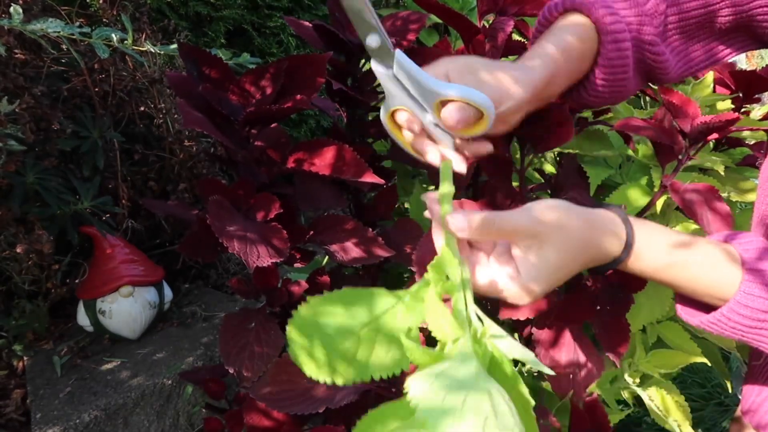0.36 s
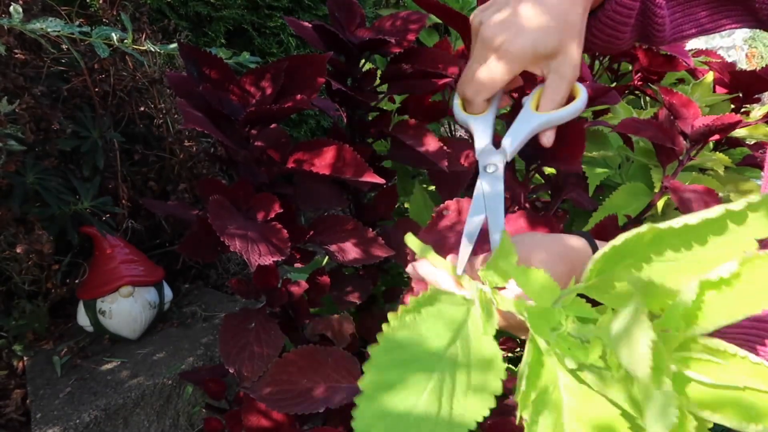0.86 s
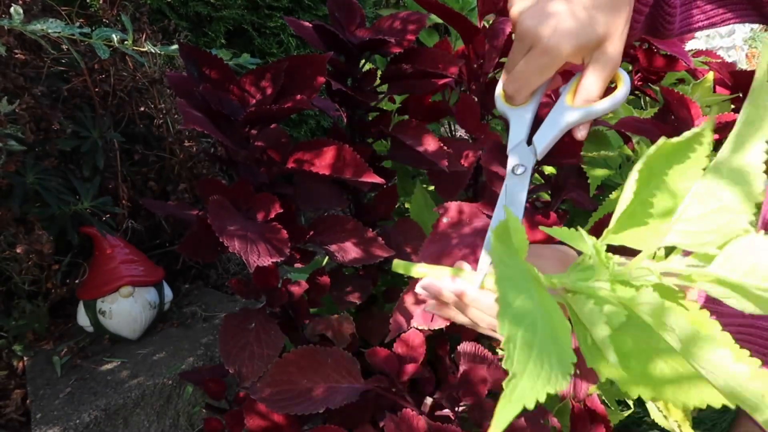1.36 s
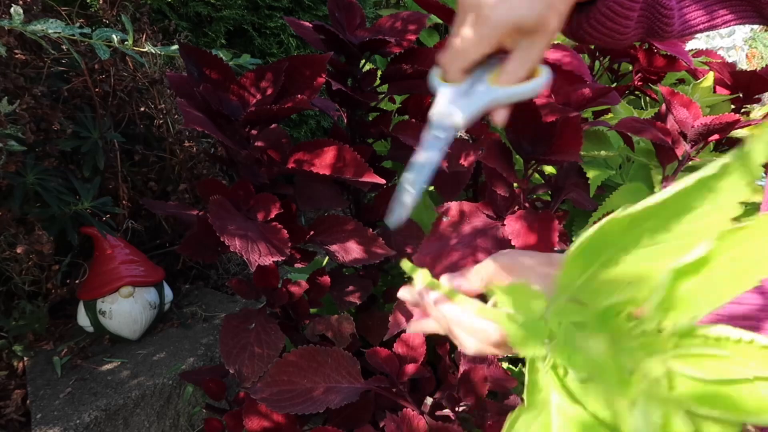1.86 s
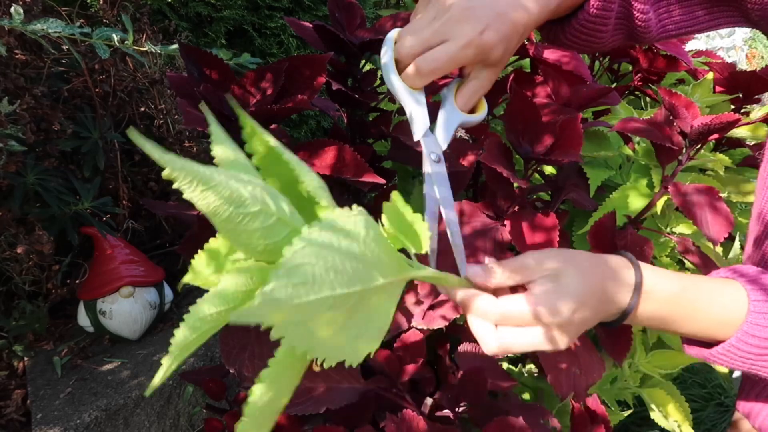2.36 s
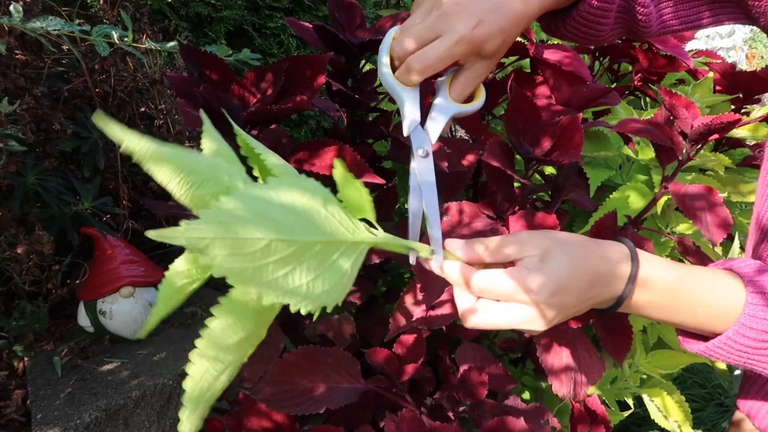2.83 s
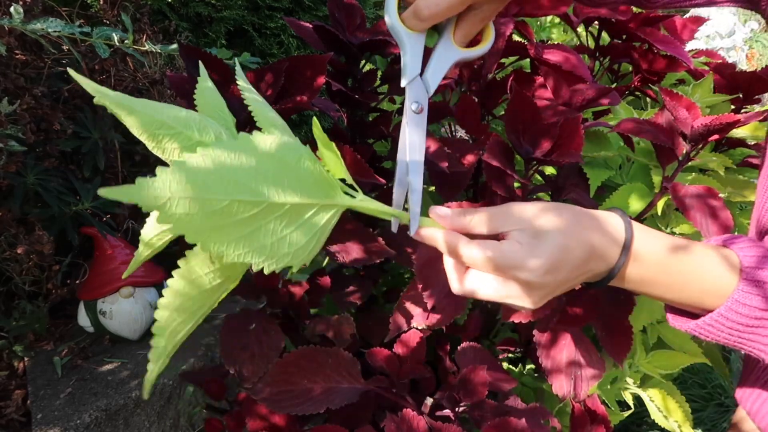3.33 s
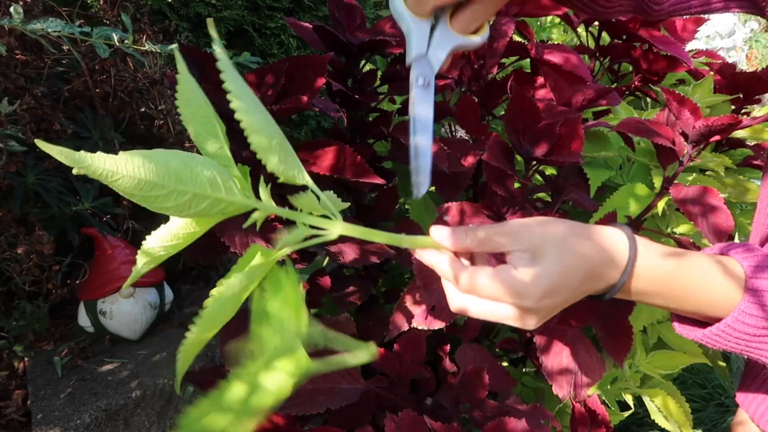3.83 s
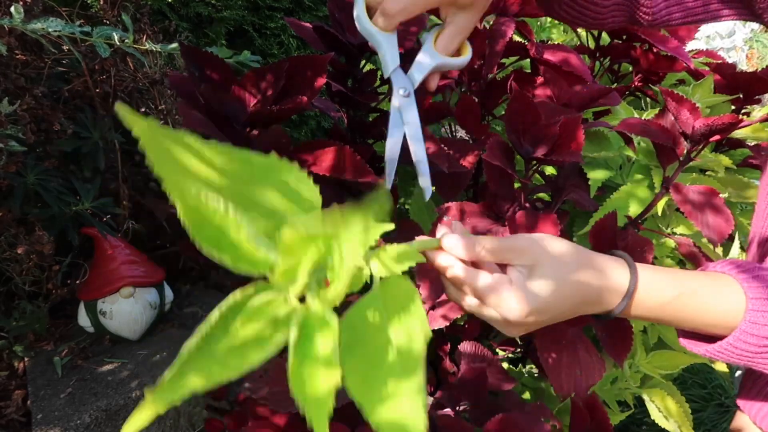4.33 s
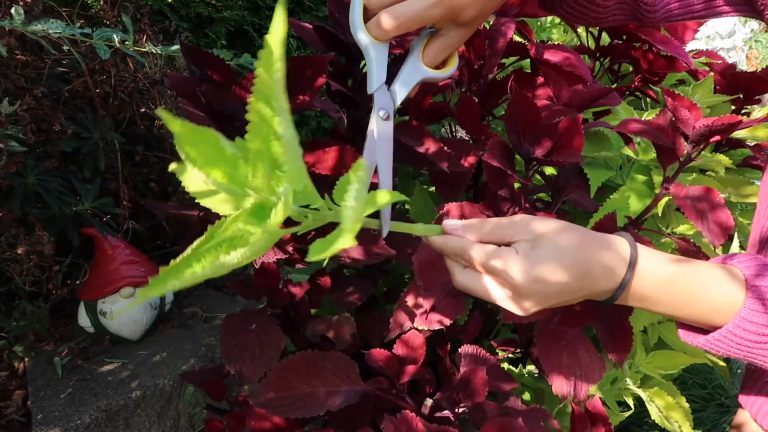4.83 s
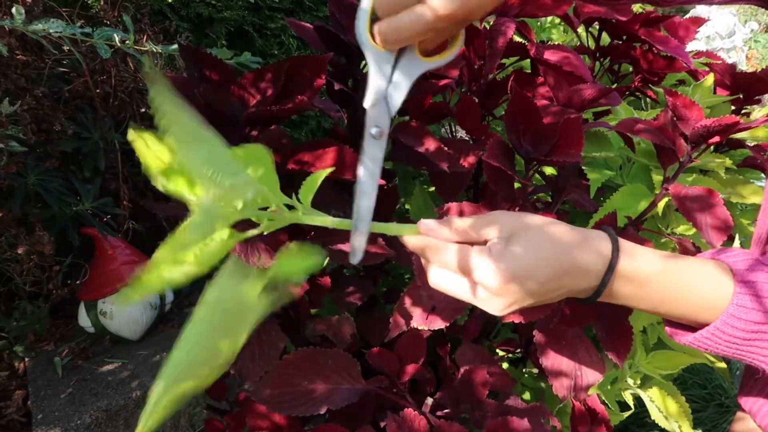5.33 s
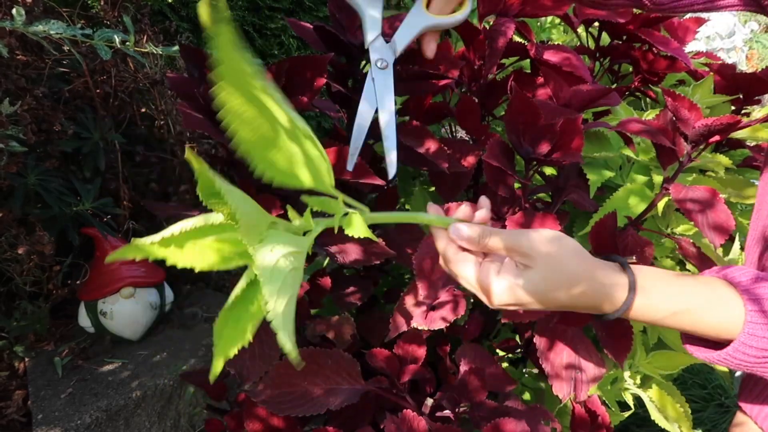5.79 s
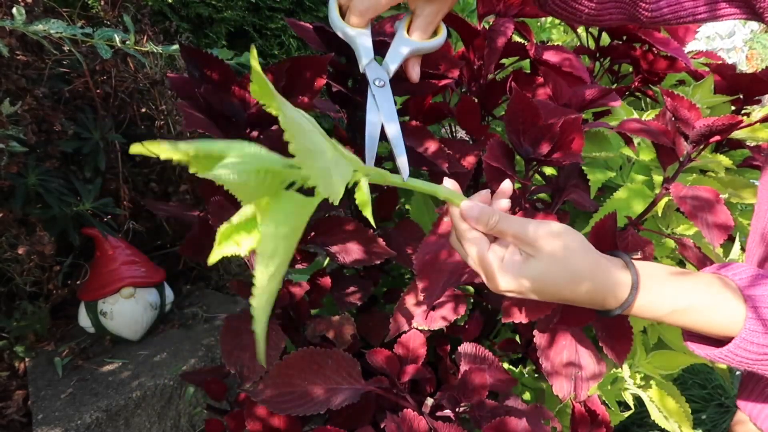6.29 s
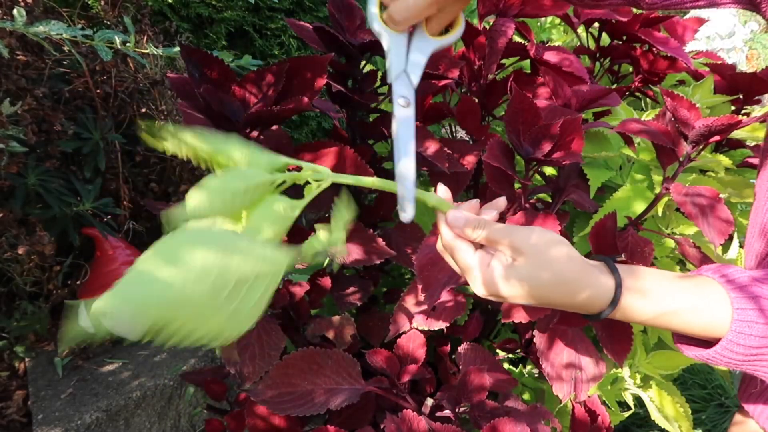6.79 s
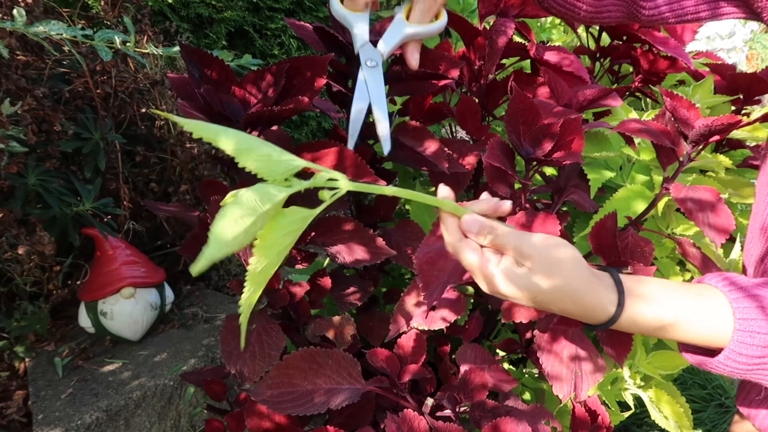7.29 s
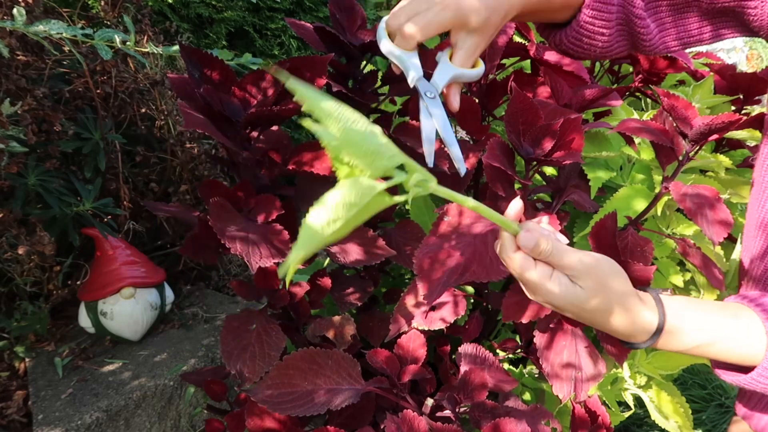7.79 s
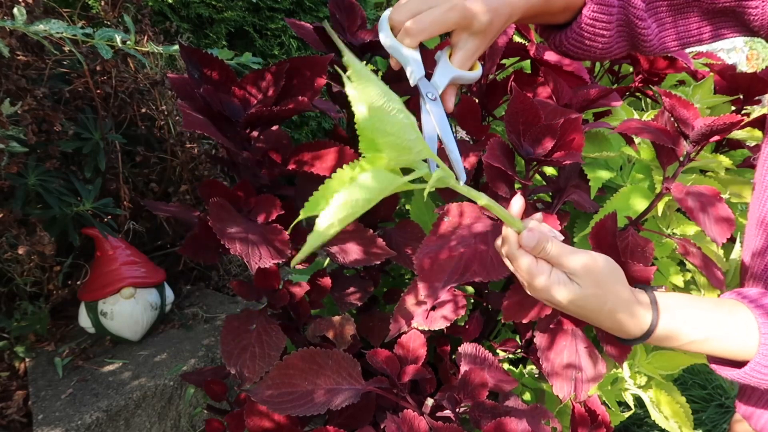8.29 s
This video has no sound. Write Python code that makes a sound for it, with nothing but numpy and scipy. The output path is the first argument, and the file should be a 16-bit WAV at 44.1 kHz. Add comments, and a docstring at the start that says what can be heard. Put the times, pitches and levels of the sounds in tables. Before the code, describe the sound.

Four crisp, close scissor snips crunch through soft plant stems, with leaves rustling between cuts over a faint low traffic rumble outdoors.

```python
"""Scissors in the garden

Steel scissors snip soft plant stems close to a phone. Crunches are lumpy noise through a resonance;
the blades clack shut as short rings with a crack and a thud, and the ground and foliage answer.
Leaves brush and drop between cuts as softer noise bursts, with a few low knocks as dying sine waves.
Far traffic is drifting, shaped noise, and a faint steady line at 13 kHz is a wavering sine wave.
"""
import sys
import numpy as np
from scipy import signal
from scipy.fft import rfft, irfft, next_fast_len
from scipy.io import wavfile
from scipy.ndimage import uniform_filter1d, map_coordinates

SR = 44100
rng = np.random.default_rng(int(sys.argv[2]) if len(sys.argv) > 2 else 0)


def boost(x):
    """Linear amplitude factor 10**(x/20) for a level x in decibels (scalar or array-like)."""
    u = np.asarray(x, float) / 20
    return 10 ** u


def file_out(sig):
    """Save sig as 16-bit WAV at sys.argv[1]."""
    # one column per channel
    cols = np.atleast_2d(sig).T
    # limit, then scale
    lim = np.clip(cols, -1, 1)
    pcm = np.round(lim * 32767).astype(np.int16)
    wavfile.write(sys.argv[1], SR, pcm)


N = 381465  # length in samples


def unit(x):
    """Scales a sound to an average strength (rms) of 1."""
    return x / np.sqrt(np.mean(x ** 2) + 1e-20)


def along(points, hz):
    """Reads a curve of (pitch_hz, value) points, with straight lines on a log pitch axis."""
    f, v = np.transpose(points)
    return np.interp(np.log(hz + 1), np.log(f + 1), v)


def wobble(rate):
    """A smooth random curve with `rate` random points a second."""
    knots = rng.standard_normal(int(N * rate / SR) + 4)
    return map_coordinates(knots, [np.arange(N) * rate / SR])


def filtered(x, response):
    """Changes the strength and phase of each frequency by response(hz)."""
    size = next_fast_len(x.shape[-1] + 2048)
    spectrum = rfft(x, size) * response(np.fft.rfftfreq(size, 1 / SR))
    return irfft(spectrum, size)[..., :x.shape[-1]]


def add(track, s, sound):
    """Mixes a sound into a track from time s in seconds."""
    part = track[round(s * SR):][:len(sound)]
    part += sound[:len(part)]


def rush(spectrum):
    """Stereo noise of rms 1; a shared part and an opposed part set how alike left and right are."""
    # Likeness of left and right: pitch_hz, likeness (1 = the same, 0 = unrelated)
    alike = [(30, .99), (70, .97), (110, .955), (170, .72), (240, .39), (480, .25), (950, .77), (1890, .66),
             (3770, .22), (7520, .18), (15000, .01)]

    def mid_and_side(hz):
        turn = np.arccos(np.clip(along(alike, hz), -1, 1)) / 2
        return boost(along(spectrum, hz)) * [np.cos(turn), np.sin(turn)]

    mid, side = filtered(rng.standard_normal((2, N)), mid_and_side)
    return unit(np.array([mid + side, mid - side]))


def crackle(rows, grain_db, grain_s, low_hz, rise, fade, hiss_db):
    """Bursts of lumpy noise through one resonance, thinned in the bass, plus a broad hiss."""
    out, t = np.zeros(N), np.arange(SR // 8) / SR
    for s, db, hz, length, sharp in rows:
        noise, lumps = rng.standard_normal((2, len(t)))
        lumps = unit(uniform_filter1d(lumps, max(1, round(grain_s * SR))))
        grains = noise * boost(grain_db * lumps)

        def body(f):
            resonance = hz * hz / (hz * hz - f * f + 1j * f * hz / sharp)
            hiss = boost(hiss_db) / (1 + (f / 11000) ** 4)
            bass_cut = f / (f - 1j * low_hz)
            return (resonance + hiss) * bass_cut

        u = t / abs(length)
        shape = (1 - np.exp(-u / rise)) * np.exp(-u ** fade)  # longer strokes start more softly
        burst = shape * filtered(grains, body)
        add(out, s, boost(db) * burst * np.linalg.norm(shape) / np.linalg.norm(burst))
    return out


def traffic():
    """Far roads: a low rumble and a broad wash of shaped noise, both drifting a little in level."""
    # Tone of the low rumble: pitch_hz, relative level_db_per_hz
    rumble_tone = [(12, -68), (20, -16), (35, -11), (64, -0.5), (108, -1.5), (123, -0.5), (171, -23),
                   (231, -23), (260, -16), (340, -49.5), (570, -120)]
    # Tone of the broad wash: pitch_hz, relative level_db_per_hz
    wash_tone = [(94, -23.5), (160, 0), (172, -1), (239, -3.5), (298, -5), (393, -4.5), (499, -9.5),
                 (720, -9), (1220, -10.5), (1420, -12), (1670, -15), (6260, -32), (12800, -42),
                 (16600, -54.5), (22000, -120)]
    # Slow level of the rumble, before the random drift: time_s, rms level_db
    rumble_level = [(0.0, -44.5), (0.38, -47.5), (0.79, -42.5), (1.3, -45), (2.29, -46), (2.82, -41.5),
                    (3.6, -47.5), (3.95, -43.5), (4.5, -46.5), (5.0, -44), (5.6, -47.5), (6.3, -44),
                    (6.46, -42), (6.65, -46.5), (7.13, -41.5), (7.85, -45.5), (8.3, -42.5), (8.65, -38.5)]
    now = np.arange(N) / SR
    rumble_db = np.interp(now, *np.transpose(rumble_level)) + 1.4 * wobble(3.3)
    rumble = boost(rumble_db) * rush(rumble_tone)
    wash_top_hz = 13050  # the wash is silent from here up
    wash = filtered(rush(wash_tone), lambda hz: hz < wash_top_hz)
    start_db, growth_db_per_s = -49.5, 0.0979
    wash_db = start_db + growth_db_per_s * now + 0.15 * wobble(2.98)
    return rumble + boost(wash_db) * wash


def high_line():
    """A faint steady 13 kHz line: a slightly wavering sine wave, out of step between left and right."""
    pitch_hz, level_db = 13000, -76.5
    phase = 2 * np.pi * pitch_hz * np.arange(N) / SR + 1.1 * wobble(9.2)
    left_right = np.array([[1.0], [-1.0]])  # phase shift in radians
    return boost(level_db + 1.5 * wobble(10)) * np.sin(phase + left_right)


def scrapes(count):
    """The sprig turns and rustles faintly: small chance scrapes spread through each spell."""
    # Rustling spells: start_s, length_s, middle rms level_db of one scrape
    rustles = [(.29, .22, -58), (1.73, .08, -60), (1.95, .04, -57), (2.05, .06, -58), (3.22, .1, -57),
               (3.67, .1, -57), (3.82, .08, -60), (4.3, .14, -56.5), (5.37, .11, -56)]
    pitch_hz, length_s, sharpness = 2900, .02, 2.3  # middle values of pitch and length
    spread_db, spread_pitch, spread_length = 1.5, .2, .3  # the last two as natural logs
    rows = []
    for start, spell, db in rustles:
        chances = np.c_[rng.random(count), rng.standard_normal((count, 3))]
        for k, (when, level, pitch, size) in enumerate(chances):
            rows.append((start + spell * (k + when) / count,
                         db + spread_db * level,
                         pitch_hz * np.exp(spread_pitch * pitch),
                         length_s * np.exp(spread_length * size),
                         sharpness))
    return rows


def patchy(x, depth_db):
    """Random gain patches in time and pitch make each scrape favour its own pitch for a few ms."""
    z = signal.stft(x, nperseg=128)[2]
    field = uniform_filter1d(rng.standard_normal(z.shape), size=2, axis=0)  # across pitch
    field = uniform_filter1d(field, size=4, axis=1)  # across time
    gain = boost(depth_db * unit(field))
    gain = gain / np.sqrt(np.mean(gain ** 2))
    return signal.istft(z * gain, nperseg=128)[1][:N]


def leaves():
    """Leaves brush, blades scrape and cuttings land: grainy noise bursts with a patchy pitch."""
    # Brushes, scrapes and landings: start_s, rms level_db, pitch_hz, length_s, sharpness (no unit)
    leaf_sounds = [(.379, -55, 2580, 0.06, 2.5), (.46, -43.5, 2000, 0.031, 8.1),
                   (.468, -49, 4320, 0.026, 1.6), (1.846, -52, 3200, .008, 1.5),
                   (1.94, -49, 2500, 0.049, 1.8), (1.988, -41, 3000, 0.0057, 2.2),
                   (2.0133, -39, 1900, 0.005, 1.5), (2.085, -46, 2460, 0.035, 0.56),
                   (2.108, -46, 2000, 0.018, 3.8), (2.228, -48, 2900, 0.042, 1.9),
                   (2.26, -52, 2860, 0.071, 0.6), (2.273, -42.5, 4500, 0.0056, 0.41),
                   (3.309, -43.5, 3020, 0.0039, 0.91), (3.409, -52, 2500, .0081, .8),
                   (3.70, -47.5, 6200, 0.02, 4.5), (3.708, -49, 2380, 0.031, 3.5),
                   (3.75, -49, 2850, 0.015, 1.5), (3.90, -52, 3700, 0.0091, 1.4),
                   (4.0088, -40.5, 1700, 0.0069, 0.8), (4.035, -44, 2600, 0.034, 0.96),
                   (4.126, -50.5, 3600, .04, 0.73), (5.375, -47.5, 4560, 0.048, 0.56),
                   (5.436, -50.5, 3800, 0.037, 1.6), (5.552, -50.5, 2520, 0.012, 1.5),
                   (5.569, -45, 2880, 0.012, 1.3), (5.736, -38, 2780, 0.0071, 2.8),
                   (5.7433, -34.5, 2170, 0.015, 0.65), (5.76, -46.5, 2500, 0.036, 1.9),
                   (5.7858, -35.5, 3150, 0.0048, 0.41), (5.857, -44.5, 4530, 0.0031, 1.9),
                   (6.27, -54, 2500, 0.02, 1.2), (6.83, -46, 2840, 0.047, 1.1), (6.87, -40, 2860, 0.016, 1),
                   (6.997, -53.5, 4500, 0.021, 1.1), (7.018, -45.5, 3200, 0.005, 0.75),
                   (7.096, -49, 2200, 0.012, 1.7), (7.2265, -36, 2000, 0.0039, .8),
                   (7.231, -38, 4500, 0.0057, .7), (7.235, -42, 2700, 0.018, 1.1),
                   (7.26, -51, 2500, 0.03, 1.3), (7.486, -45, 3350, .0041, 3.5)]
    bursts = crackle(leaf_sounds + scrapes(count=6), grain_db=3.5, grain_s=.0015, low_hz=800,
                     rise=.1, fade=2.2, hiss_db=-30)
    return patchy(bursts, depth_db=3.5)


def stem_crunch():
    """Blades shear the stem: its tearing fibres are short bursts of fine-grained noise."""
    # Shearing bursts: start_s, rms level_db, pitch_hz, length_s, sharpness (no unit)
    crunches = [(1.6625, -44.5, 2500, .0017, 1.5), (1.667, -41, 2700, 0.0067, 2.2),
                (1.679, -43, 2700, 0.0057, 2.3), (1.6975, -24.5, 2920, 0.0036, 1.6),
                (1.7, -31, 2620, 0.0051, 0.6), (3.594, -48, 2000, .0066, 1.3),
                (3.6155, -39, 2450, 0.011, 1.7), (3.638, -43, 2700, .01, 0.96),
                (3.6492, -29, 2780, 0.014, 3.7), (5.317, -42, 1800, 0.0037, 1.7),
                (5.3277, -37, 2230, 0.0049, 1.2), (5.336, -31, 2600, 0.0014, 2),
                (5.339, -31, 2300, .0075, 0.75), (6.75, -50, 2000, 0.049, 1.9),
                (6.785, -40, 2220, 0.014, 2.2), (6.8045, -18.5, 2600, 0.0012, 1.7),
                (6.806, -25, 2620, 0.0029, .8)]
    return crackle(crunches, grain_db=2, grain_s=0.0004, low_hz=900, rise=0.017, fade=6, hiss_db=-38)


def clacks():
    """Each meeting of the blades rings the hand-damped steel briefly, with a crack and a dull thud."""
    # Blades meeting, then touching again: start_s, peak level_db, gap_s, second peak level_db,
    # treble boost_db
    meetings = [(1.7059, -1.5, .0016, -12, .5), (3.6556, -2.5, .0016, -3, 0),
                (5.3467, -8.5, .0025, -13.5, 1), (6.8093, -3, .0015, -10, 1)]
    # What the scissors ring with: pitch_hz, relative level_db, time_s to fade by 60 dB without the grip
    blades = [(910, -18, 0.048), (1900, 3, 0.004), (2390, 9, 0.0059), (2700, 4.5, 0.015),
              (3314, -0.5, 0.02), (3300, -8, 0.025), (3520, 0.5, 0.0085), (4020, -51, 0.0019),
              (5340, -10.5, 0.02), (5860, 2, 0.012), (6440, 1, 0.011), (7090, -1, 0.0099),
              (7480, -32, 0.0034), (10900, -16.5, 0.022), (9840, -1, 0.0058), (11300, -14.5, 0.0054),
              (13400, -3.5, .006)]
    grip = .88  # the hand shortens the ringing by this factor
    thud_db, second_thud_db = -17, -23  # before each blow is scaled to its peak
    out, t = np.zeros(N), np.arange(SR // 20) / SR
    hz, level, t60 = np.transpose(blades)[:, :, None]
    contacts = []
    for s, db, gap, second_db, treble_db in meetings:
        contacts.append((s, db, treble_db, thud_db))
        contacts.append((s + gap, second_db, treble_db, second_thud_db))
    for s, db, treble_db, low_db in contacts:
        scatter, detune = rng.standard_normal((2, len(blades), 1))
        strength = level + 2 * scatter + treble_db * (hz > 4500)
        pitch = hz * (1 + 0.025 * detune)
        ring = boost(strength - 60 * t / (grip * t60)) * np.sin(2 * np.pi * pitch * t)
        one_cycle = [.4, .8, .8, .4, -.4, -.8, -.8, -.4]  # favours noise around 5 kHz
        noise = np.convolve(rng.standard_normal(len(t) + 7), one_cycle, 'valid')
        crack = .7 * boost(treble_db - 60 * t / .013) * noise
        thud = boost(low_db - 60 * t / 0.0089) * np.sin(2 * np.pi * 450 * t)
        blow = (1 - np.exp(-t / 0.00025)) * (ring.sum(0) + crack + thud)
        add(out, s, boost(db) * blow / abs(blow).max())
    return out


def thumps():
    """Soft low knocks: sine waves that start gently and die away quickly."""
    # Dull low knocks: start_s, level_db before doubling, pitch_hz, time_s to fade by 60 dB
    knocks = [(2.01, -42.5, 172, 0.11), (5.756, -36, 90, 0.097), (7.477, -32.5, 70.4, 0.13),
              (7.86, -28.5, 139, 0.04)]
    out, t = np.zeros(N), np.arange(SR // 4) / SR
    for s, db, hz, t60 in knocks:
        shape = boost(db - 60 * t / t60) * (1 - np.exp(-t / 0.0015))
        add(out, s, shape * 2 * np.sin(2 * np.pi * hz * t))
    return out


def garden(x):
    """One delayed echo off the ground, then scatter from soil and foliage, different at each port."""
    # Colour of the ground echo: pitch_hz, level_db
    ground = [(1500, -34), (4000, -27), (6500, -14), (8000, -18), (10000, -40)]
    # Scatter from soil and foliage: pitch_hz, relative level_db, time_s to fade by 60 dB
    foliage = [(500, -24, .08), (1500, -24, .08), (3000, -22, .1), (5000, -19, .15), (7500, -18, .18),
               (9500, -28, .1), (11000, -45, .05)]
    delay_s = .0113
    echo = filtered(x, lambda hz: boost(along(ground, hz)) * np.exp(-2j * np.pi * hz * delay_s))
    band, db, t60 = np.transpose(foliage)
    hz, t, z = signal.stft(rng.standard_normal((2, SR // 3)), SR, nperseg=128)
    decay = boost(-60 * t / along(np.c_[band, t60], hz)[:, None])
    decay /= np.linalg.norm(decay, axis=1, keepdims=True)
    decay *= boost(along(np.c_[band, db], hz))[:, None]
    tail = signal.istft(z * decay, SR, nperseg=128)[1] / 8
    return echo, signal.fftconvolve(x[None], tail, axes=1)[:, :N]


def reach_ports(x):
    """Near sound reaches the phone's two ports with a phase gap in the treble, split between them."""
    # Phase by which the left port leads: pitch_hz, phase_radians
    port_lead = [(2000, 0), (3800, -.25), (5000, -.7), (6500, -1.2), (8200, -2.3), (12000, -2.3),
                 (14000, -1.7)]
    left_right = np.array([[1], [-1]])
    return filtered(x, lambda hz: np.exp(.5j * along(port_lead, hz) * left_right))


def scene():
    """Adds near sounds and their echoes to the low knocks, traffic and faint high line."""
    near = clacks() + stem_crunch() + leaves()
    echo, scatter = garden(near)
    direct = reach_ports(near + echo)
    return direct + scatter + thumps() + traffic() + high_line()


def roll_off(x):
    """The treble ends steeply here."""
    return signal.sosfilt(signal.butter(12, 16990, fs=SR, output="sos"), x)


def record(dry):
    """The phone's band limit: a steep cut of the highest treble."""
    top_hz = 16000
    finished = filtered(dry, lambda hz: 1 / (1 + (hz / top_hz) ** 40))
    return roll_off(finished)


dry = scene()
out = record(dry)
file_out(out)
```